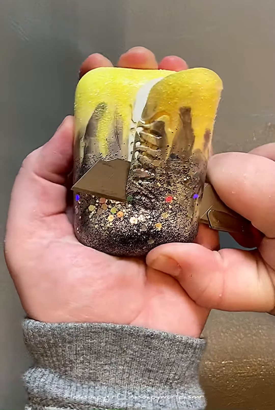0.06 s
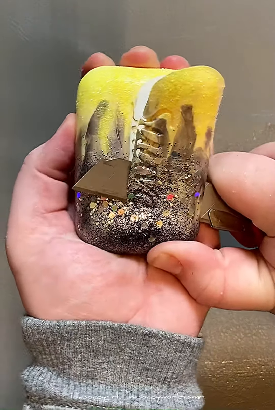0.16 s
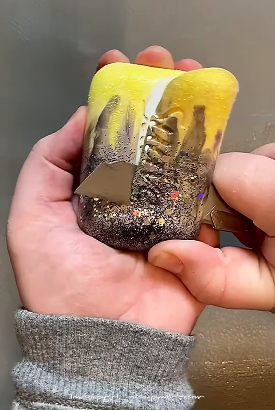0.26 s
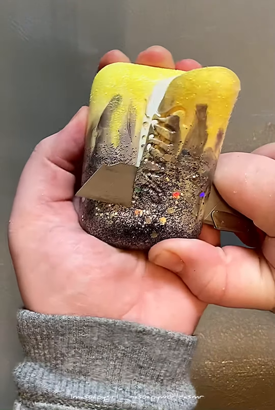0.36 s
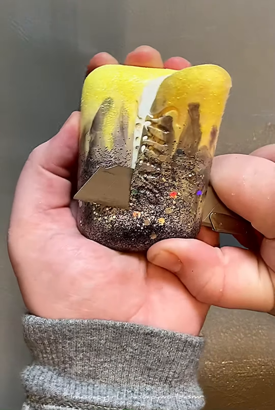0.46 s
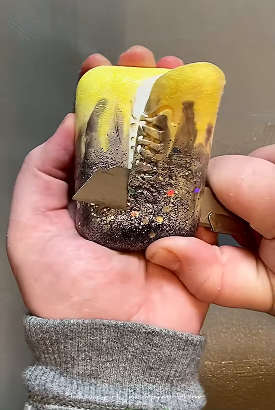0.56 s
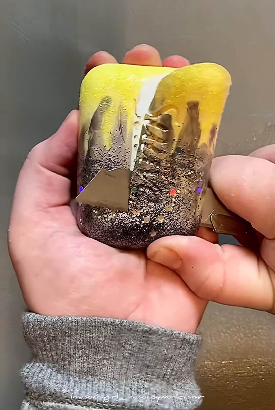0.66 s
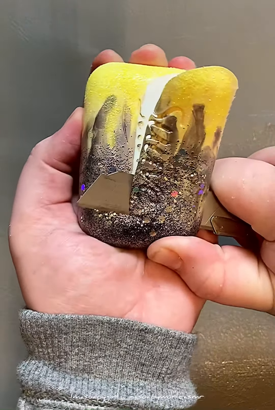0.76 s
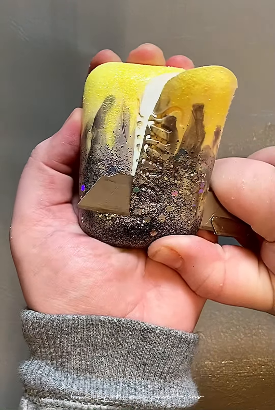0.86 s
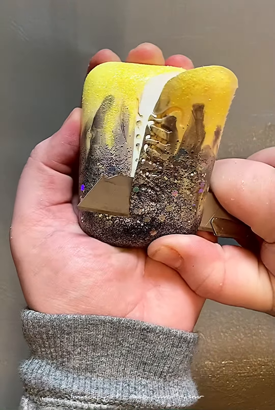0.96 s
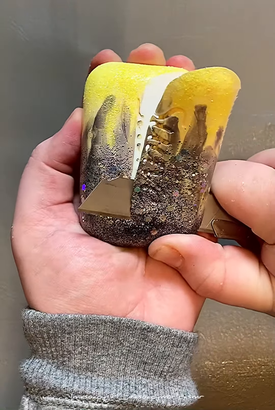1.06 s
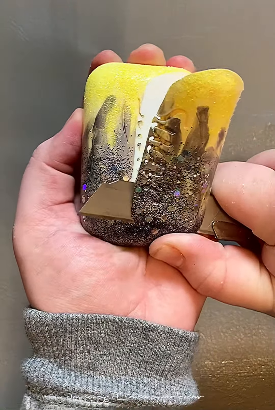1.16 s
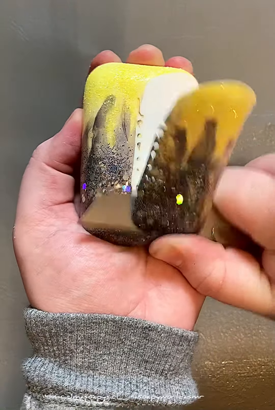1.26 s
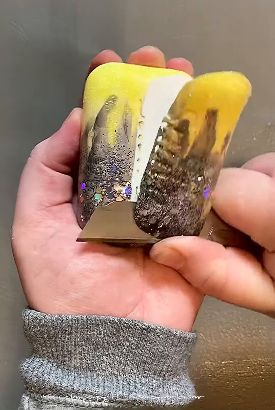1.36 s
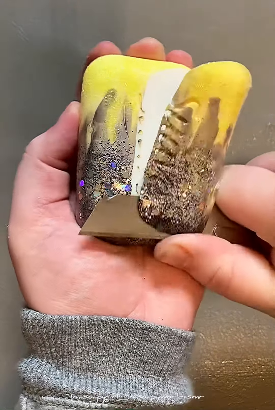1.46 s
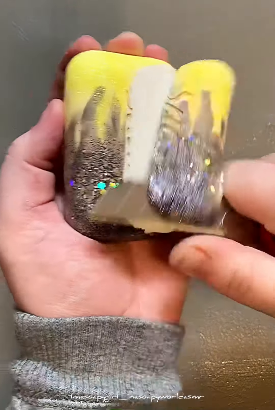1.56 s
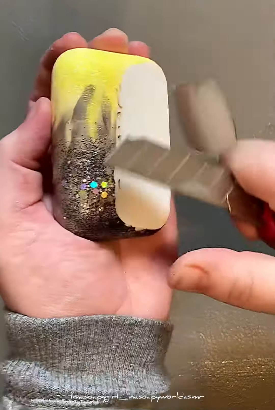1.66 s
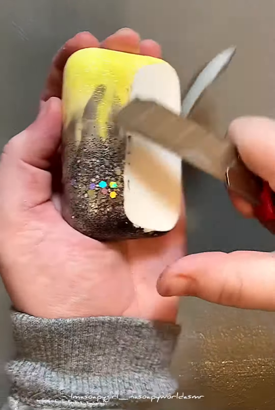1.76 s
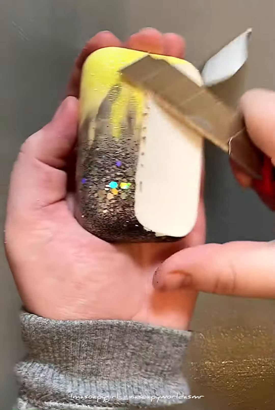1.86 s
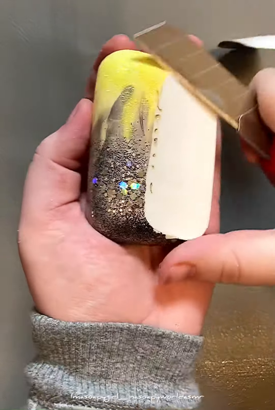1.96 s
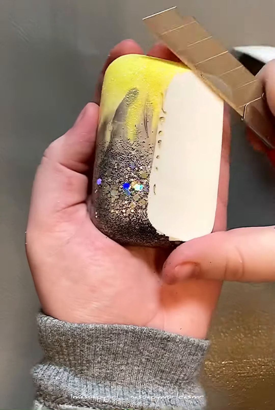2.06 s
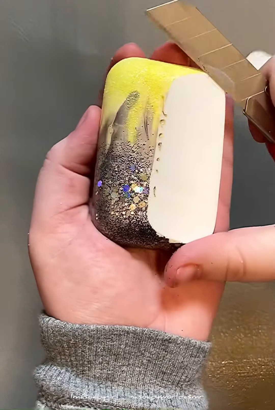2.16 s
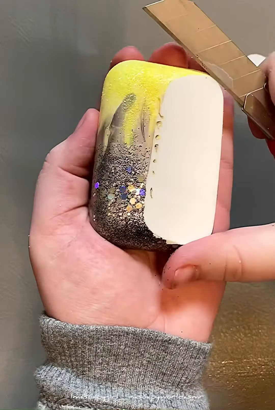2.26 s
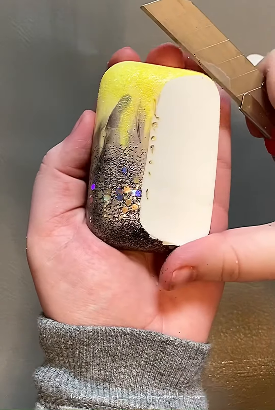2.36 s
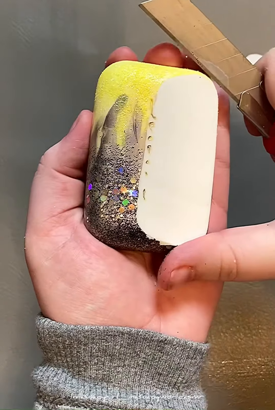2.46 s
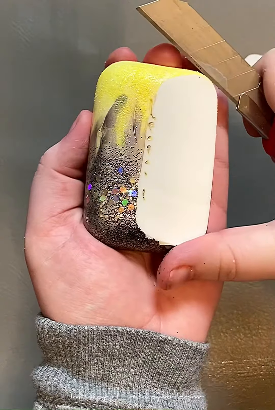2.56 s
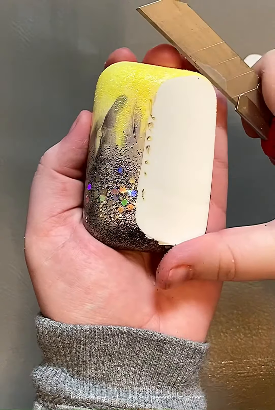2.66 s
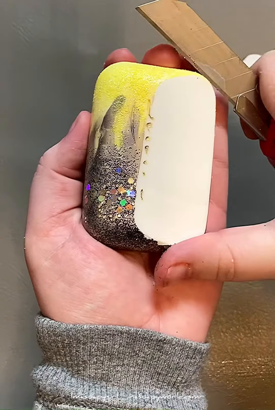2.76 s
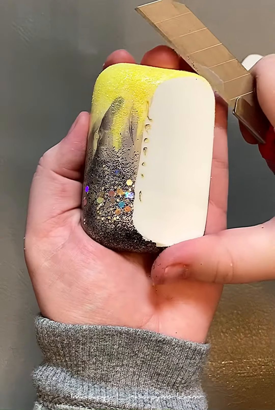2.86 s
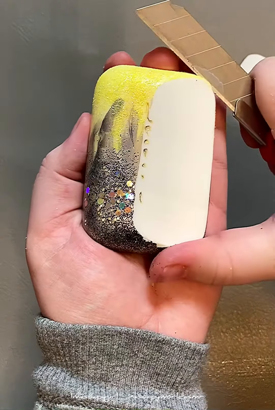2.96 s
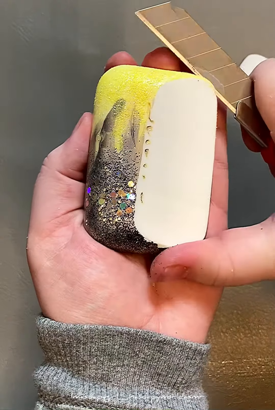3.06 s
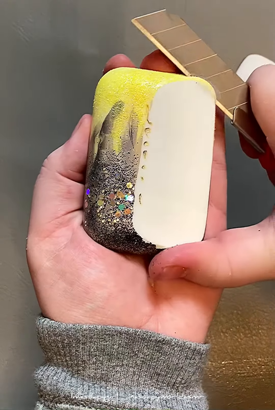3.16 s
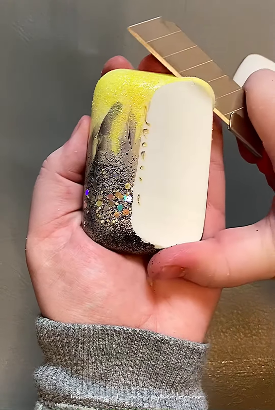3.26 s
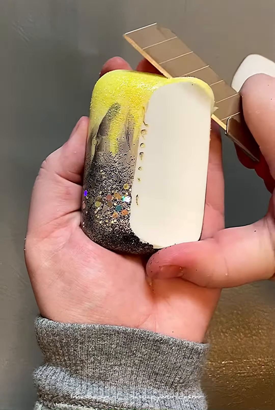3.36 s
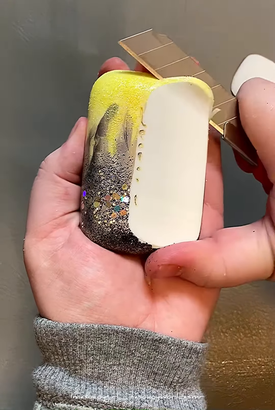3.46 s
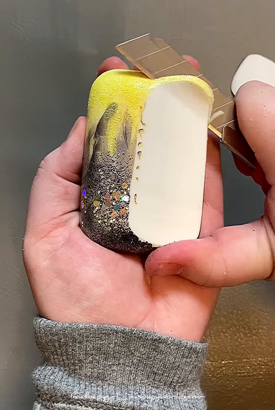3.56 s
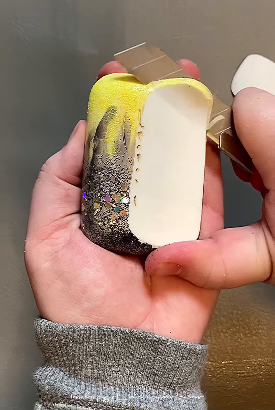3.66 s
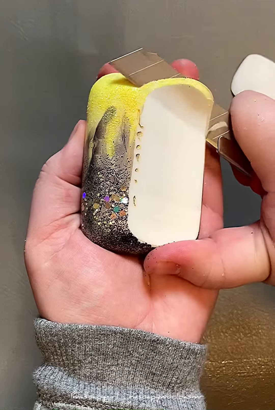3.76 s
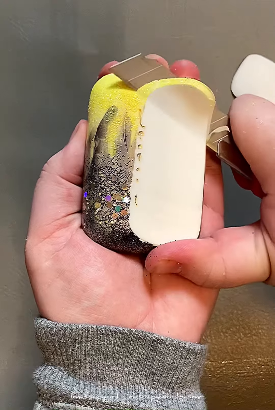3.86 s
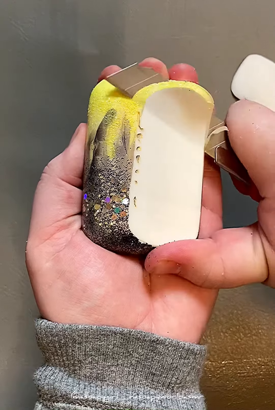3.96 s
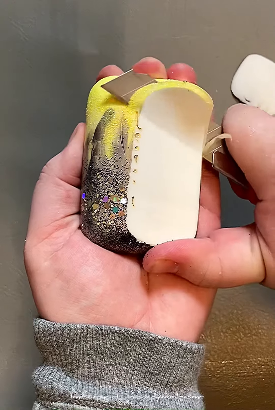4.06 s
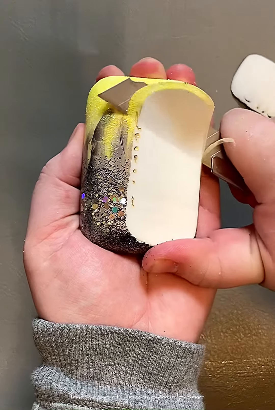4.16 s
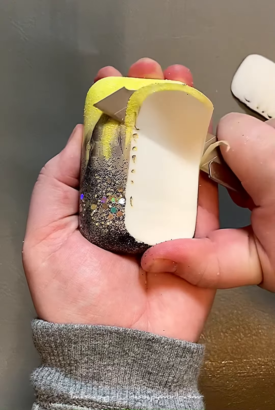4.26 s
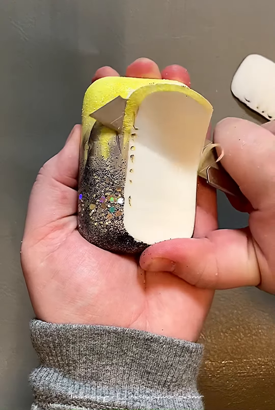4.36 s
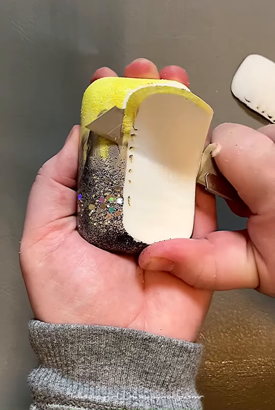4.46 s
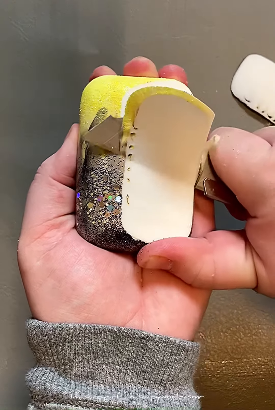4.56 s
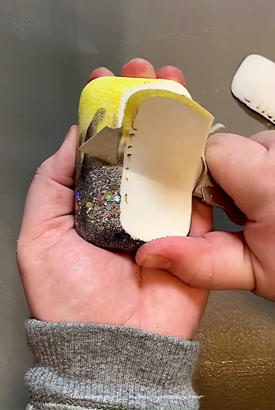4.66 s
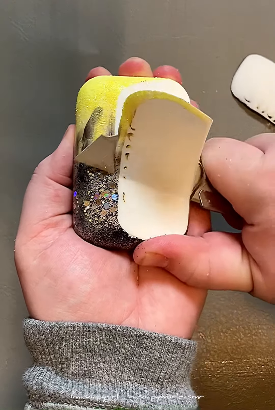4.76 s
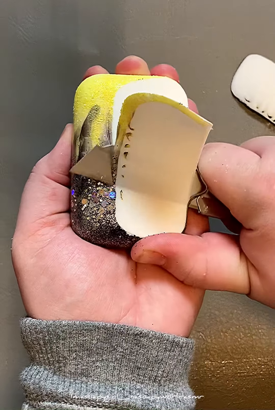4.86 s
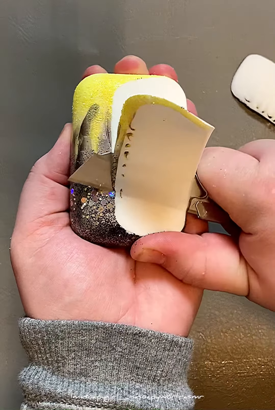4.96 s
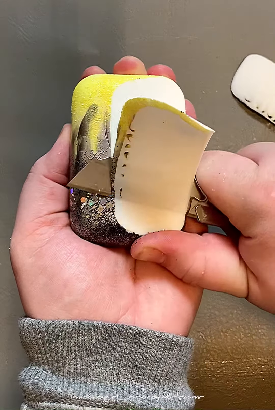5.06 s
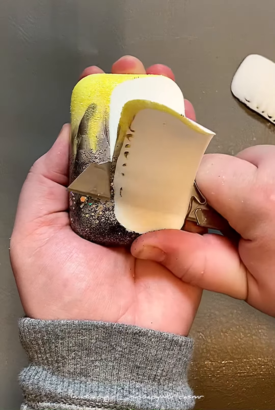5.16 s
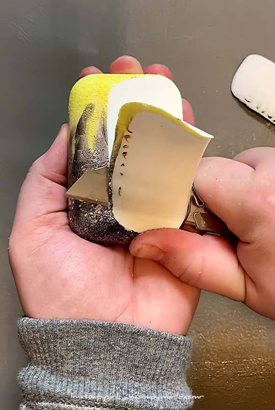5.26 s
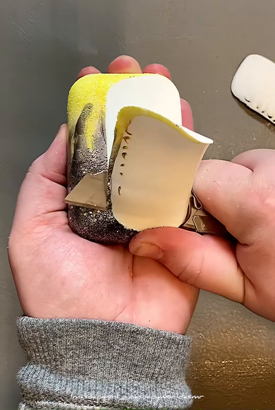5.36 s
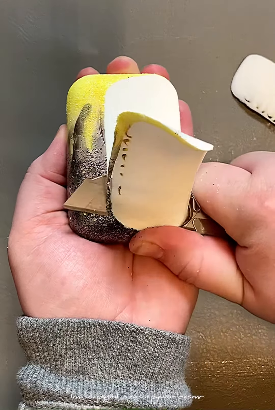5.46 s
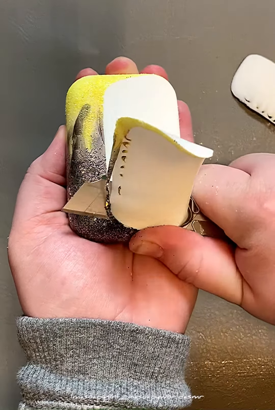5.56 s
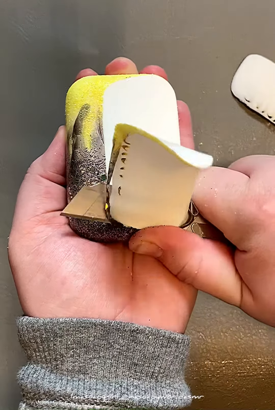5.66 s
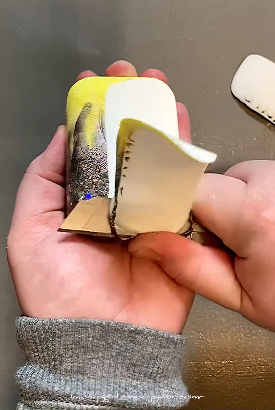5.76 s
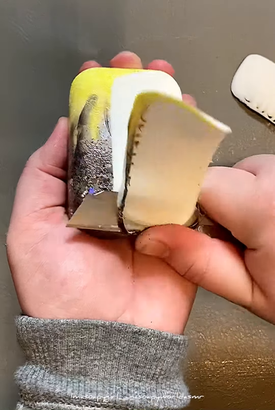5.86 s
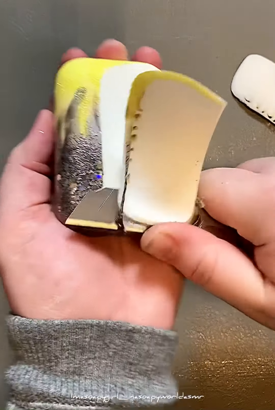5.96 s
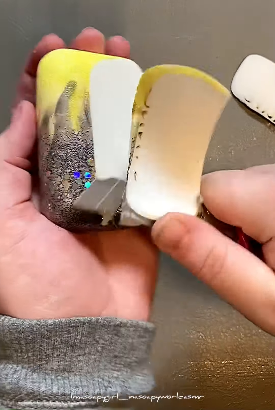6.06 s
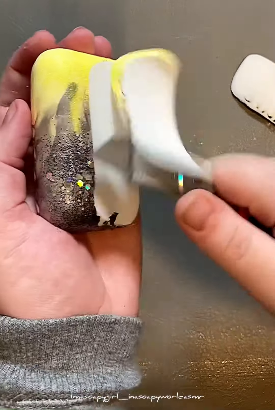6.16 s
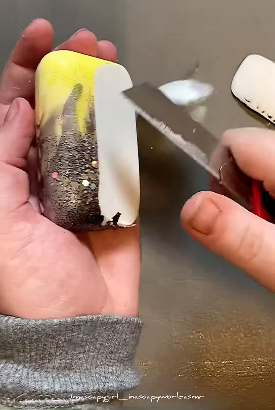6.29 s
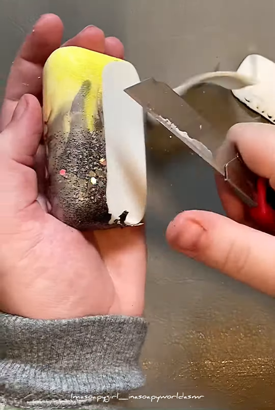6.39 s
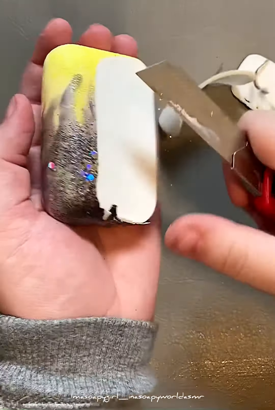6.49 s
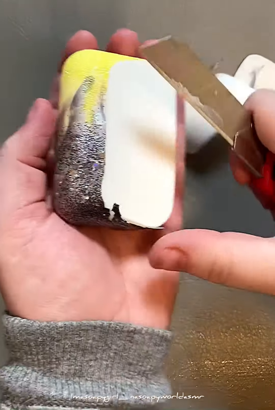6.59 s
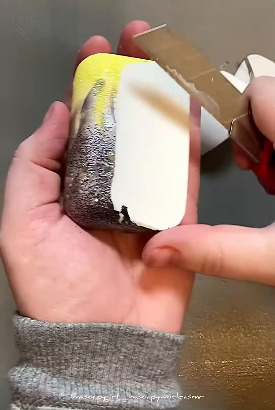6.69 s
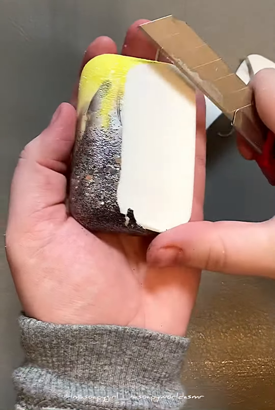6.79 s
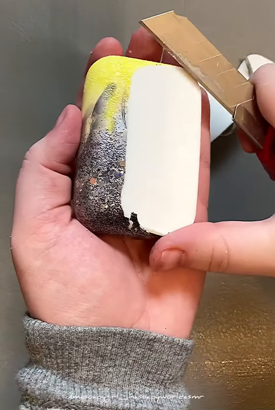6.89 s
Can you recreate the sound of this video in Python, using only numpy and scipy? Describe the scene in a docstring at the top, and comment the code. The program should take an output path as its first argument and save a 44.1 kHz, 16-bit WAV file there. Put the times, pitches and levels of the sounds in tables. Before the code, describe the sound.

Close up in a small quiet room, a thin knife cracks through a dry soap bar with brittle snaps and a light blade rattle. The first slab drops onto the table in a few dull thumps and scrapes. After a lull, finer crunches and crumbling begin a second cut, which breaks off with sharp snaps, a brief squeak and another tumble. Low ventilation rumbles throughout.

```python
"""Ventilation rumbles and hums in a small room: coloured noise, a motor hum and wandering drones.
Close to a small stereo recorder, a snap-off knife shaves two slabs from a bar of dry soap.
Tiny slips make the edge crunch, tear and scrape; gritty pulses crack the slab and jolt the blade.
The blade squeaks and whistles free by stick-slip; chirped thumps flop the slab onto the table."""
import sys
import numpy as np
from scipy import signal
from scipy.fft import rfft, irfft, next_fast_len
from scipy.io import wavfile
from scipy.ndimage import uniform_filter1d, map_coordinates

SR = 44100
rng = np.random.default_rng(int(sys.argv[2]) if len(sys.argv) > 2 else 0)


def master_out(mix):
    """Clip the mix to full scale and print it as 16-bit PCM to the path in sys.argv[1]."""
    frames = np.transpose(np.atleast_2d(mix))
    ceiling = np.clip(frames, -1, 1)
    pcm = np.round(ceiling * 32767).astype(np.int16)
    wavfile.write(sys.argv[1], SR, pcm)


N = 305613
TIME = np.arange(N) / SR  # s
HIT = np.arange(4096) / SR  # s, the time line of one short event
SIDES = np.array([[1], [-1]])  # left, right

# All level_db columns are relative: the functions balance and place the sources.

# Ventilation rumble: start_s [s], level_db [dB]
VENT_LEVEL = [(0, -51), (.35, -54), (3.4, -51.5), (4.3, -55), (5.5, -55), (6.3, -53), (6.6, -50),
              (6.75, -60.5), (6.93, -51)]
# Rumble spectrum: pitch_hz [Hz], level_db [dB per Hz]
RUMBLE_SPECTRUM = [(21, -44), (31, -29.5), (41, -8.5), (53, -3.5), (73, -0.14), (96, -1.5), (121, -4.5),
                   (151, -9.5), (191, -11.5), (241, -27), (331, -33), (610, -64.5), (1510, -62)]
# Faint air hiss spectrum: pitch_hz [Hz], level_db [dB per Hz]
HISS_SPECTRUM = [(100, 11.5), (500, 1.5), (1200, -7.5), (2500, -5), (5000, 3.5), (12000, -3), (15000, -5),
                 (15700, -16.5)]
HUM_HZ, HUM_DB = 58, -52.5  # motor hum, about which pitch and level waver
# Three low drones that wander in pitch, one curve each: start_s [s], pitch_hz [Hz], level_db [dB]
DRONE_CURVES = [
    [(0, 68, -58.5), (1.6, 73, -56), (2.9, 73, -61), (3.03, 75, -71), (3.1, 89, -49.5), (3.4, 80, -54.5),
     (3.9, 72, -63.5), (5.2, 67, -64.5), (5.9, 72, -48.5), (6.6, 72, -50), (6.75, 72, -77)],
    [(0, 109, -48), (.8, 112, -54), (1.4, 117, -57.5), (2.0, 119, -57.5), (2.3, 119, -64.5)],
    [(.5, 152, -70), (1.4, 161, -62.5), (3.3, 165, -64.5), (3.7, 145, -62.5), (4.5, 145, -63.5),
     (4.9, 145, -74)],
]

# Soap tearing softly along the blade: start_s [s], hold_s [s], tear_db [dB], powdery_hiss_db [dB]
TEARS = [(.215, 0.016, -81.5, -79.5), (4.87, 0.059, -74.5, -87), (5.28, 0.066, -85.5, -95),
         (5.94, 0.086, -71.5, -72), (6.075, 0.031, -76, -83.5), (6.115, 0.0039, -66.5, -68),
         (6.15, 0.048, -76.5, -66.5)]
TEAR_ATTACK_S, TEAR_RELEASE_S = .018, .022
# Tear spectrum: pitch_hz [Hz], level_db [dB per Hz]
TEAR_SPECTRUM = [(900, -19), (1600, -8.5), (2150, -11.5), (2700, 1.5), (3300, 3), (3900, -1), (4800, 1.5),
                 (6200, -35), (9000, -29)]
# Powdery hiss spectrum: pitch_hz [Hz], level_db [dB per Hz]
POWDER_SPECTRUM = [(5000, -31), (8000, 3), (10000, 1), (12500, 1), (14500, -2.5), (16000, -15)]

# Brittle fractures: start_s [s], glassy_crack_db [dB], lower_snap_db [dB], blade_jolt_db [dB],
# ring_hz [Hz] where the blade rings most, run_s [s] for which the crack runs on
FRACTURES = [(0.5849, -25.5, -57, -56, 4100, .0006), (1.2606, -19.5, -55, -36.5, 2050, 0.0009),
             (1.2664, -12, -32.5, -30, 2140, 0.00063), (1.2689, -12.5, -39, -33.5, 2050, 0.00045),
             (1.3225, -30, -20.5, -27.5, 3060, 0.001), (1.3394, -58, -53, -23, 2150, 0.00085),
             (1.381, -51, -53, -34, 2130, 0.0015), (1.3937, -44.5, -57, -67, 2130, 0.0012),
             (1.441, -38, -46.5, -40, 2740, .00084), (1.4865, -47, -48.5, -55.5, 1230, 0.0011),
             (1.5315, -40.5, -43, -25.5, 2600, 0.00068), (1.5813, -48, -56, -20.5, 2470, 0.0027),
             (1.5856, -20.5, -30.5, -16.5, 1810, 0.0029), (2.5615, -33.5, -50.5, -34, 2120, 0.00088),
             (2.5713, -50.5, -43, -23, 2570, 0.0015), (3.1085, -47, -45.5, -50.5, 4100, 0.00098),
             (3.129, -37.5, -57, -65, 4200, 0.00074), (3.166, -38, -56, -70.5, 4530, 0.0021),
             (3.324, -37.5, -45.5, -48, 3900, 0.0012), (3.5142, -37, -70, -50, 3900, 0.0005),
             (3.542, -47.5, -71, -69, 4230, .001), (3.582, -45.5, -55, -54, 4200, 0.0036),
             (3.8225, -52, -49, -51.5, 1700, 0.00096), (3.893, -52, -44, -61, 4060, 0.00087),
             (3.908, -42, -51, -68, 4200, 0.0011), (3.972, -38, -60, -72, 4200, 0.0017),
             (4.007, -35, -52, -73, 4200, 0.0013), (4.011, -39, -47, -66, 4200, .0008),
             (4.0215, -36, -61, -37, 4230, .0006), (4.025, -24, -34, -71, 4320, 0.00085),
             (4.032, -35, -48, -66, 4200, .0007), (4.0465, -35, -46, -64, 4200, .001),
             (4.062, -32, -41, -60, 4200, .0007), (4.082, -31, -46, -59, 4330, .0007),
             (4.103, -39, -54, -68, 4200, .0007), (4.136, -39, -54, -67, 4200, 0.0007),
             (4.154, -42, -48, -67, 4200, .0007), (4.161, -39, -46, -67, 4250, 0.0031),
             (4.217, -36, -51, -71, 4200, .0007), (4.2304, -32, -52, -65, 4200, 0.00088),
             (4.256, -36, -38.5, -68.5, 4300, 0.0027), (4.5717, -35.5, -40.5, -31.5, 1160, 0.00068),
             (5.5989, -37.5, -50.5, -38, 2617, 0.00081), (5.666, -37, -65, -42, 3050, 0.00045),
             (5.6949, -20.5, -42, -34, 3050, 0.0058), (5.702, -8, -29, -21, 3070, 0.0014),
             (5.712, -20, -56, -37.5, 3300, 0.00053), (5.7796, -53, -24, -26, 3150, 0.00057),
             (5.7855, -62, -38, -40.5, 1410, 0.0012), (5.931, -29, -42.5, -49, 3100, 0.00051),
             (5.9586, -26, -59, -39.5, 3920, .00082)]
# Glassy crack spectrum: pitch_hz [Hz], level_db [dB per Hz]
GLASSY_SPECTRUM = [(500, -29), (4000, -28), (7500, -9.5), (9000, -3), (10200, 3), (11200, 6), (12200, 3.5),
                   (14000, -4.5), (15400, -7.5), (16500, -26.5)]
# Lower snap spectrum: pitch_hz [Hz], level_db [dB per Hz]
SNAP_SPECTRUM = [(720, -26.5), (2450, -31.5), (3300, -14.5), (4200, 8.5), (5450, -1), (7450, 10),
                 (9450, -0.5), (14100, -13.5)]
# Modes of the blade in its holder: pitch_hz [Hz], level_db [dB], t60_s [s]
BLADE_MODES = [(1082, -1.5, .025), (1277, 3.5, 0.034), (1550, -7, .03), (1920, -18.5, .02),
               (2130, -3, 0.016), (2394, -10.5, 0.0055), (3120, 4.5, 0.0061), (3325, 3.5, .014),
               (3960, -3.5, 0.031), (4600, -9, .01)]
RATTLE_CYCLES = .014  # random phase slip per sample, blade loose in its holder
LEAD_S, LEAD_DB = 0.0011, -13.5  # soft noise swelling into each fracture: rise time, level over it
JERK_S = 0.0021  # typical spacing of the jerks of a running crack

# The blade tip springing free: time, source level, then its resonances
PING_S, PING_DB = .5857, -42
# Tip resonances: pitch_hz [Hz], width_hz [Hz], level_db [dB]
TIP_RESONANCES = [(3300, 700, -5), (4000, 650, 0)]

# Soap landing on the table: start_s [s], thump_db [dB], contact_tick_db [dB], crumb_spray_db [dB],
# bend_s [s] that the thump takes to spread through the table
LANDINGS = [(1.738, -22.5, -24.5, -35, 0.0053), (1.8028, -26.5, -29.5, -29.5, 0.0041),
            (1.877, -39.5, -45, -60, 0.0032), (2.121, -24.5, -25, -27, 0.0029),
            (2.139, -28.5, -37, -30.5, 0.005), (2.18, -33, -51, -43.5, 0.0042),
            (6.283, -21, -28, -37, 0.0051), (6.387, -34.5, -47.5, -39.5, 0.0041),
            (6.402, -25.5, -38, -40, 0.00344), (6.5006, -37, -44.5, -77, .004),
            (6.538, -50.5, -67, -77, 0.0033), (6.592, -50, -67, -75, 0.0037), (6.617, -44, -48, -67, .007)]
# Thump spectrum: pitch_hz [Hz], level_db [dB per Hz]
THUD_SPECTRUM = [(42, -41), (112, 7), (222, 3.5), (332, 8.5), (525, -5), (950, -9.5), (1650, -33.5),
                 (2650, -13), (6100, -49.5)]
# Contact tick spectrum: pitch_hz [Hz], level_db [dB per Hz]
CONTACT_SPECTRUM = [(400, -3), (1000, -5.5), (1800, -7), (2400, -22), (2900, -13.5), (3600, 0.5),
                    (4600, -8.5), (7000, -16), (9500, -16.5), (15500, -29)]
# Crumbs thrown off a landing slab: pitch_hz [Hz], level_db [dB per Hz]
SPRAY_SPECTRUM = [(2000, -24), (7000, -4), (9500, -9), (13000, -5), (16000, -14)]
# Table top modes: pitch_hz [Hz], level_db [dB], t60_s [s]
TABLE_MODES = [(108, -17, .25), (325, -13, .08), (860, -24, .05)]
THUMP_LAG_S, THUMP_LEAN_DB = -0.00014, 0  # left trails right (negative: leads), left minus right

# Strokes of the flat of the blade over soap: start_s [s], hold_s [s], rasp_db [dB], squeal_db [dB]
SLIDES = [(1.8655, 0.017, -48, -55), (1.895, 0.03, -49, -55.5), (1.935, .012, -40, -39),
          (1.949, .015, -42.5, -60), (2.087, 0.002, -40.5, -72), (2.106, 0.0054, -48.5, -58),
          (2.134, 0.0027, -56, -58.5), (6.031, 0.001, -69, -84), (6.07, 0.034, -85, -69),
          (6.112, 0.0039, -74, -46), (6.119, 0.005, -58, -41.5), (6.172, 0.0028, -63, -56)]
SLIDE_ATTACK_S, SLIDE_RELEASE_S = 0.0017, 0.001
SWELL_SHARE = 0.076  # longer strokes swell and fade more gently, by this share of their hold
# Blade flat on the soap, rasping: pitch_hz [Hz], width_hz [Hz], level_db [dB]
RASP_RESONANCES = [(1600, 580, -4), (2520, 520, -3), (3210, 790, -2), (4700, 900, -4.5),
                   (6550, 2300, -11.5)]
# Blade flat on the soap, squealing: pitch_hz [Hz], width_hz [Hz], level_db [dB]
SQUEAL_RESONANCES = [(8400, 1200, -8.5), (9970, 140, 12), (11600, 900, -7), (12800, 1100, -10.5)]

# Fingers shifting their grip: start_s [s], hold_s [s], dull_rub_db [dB], palm_slide_db [dB]
FINGERS = [(2.65, 0.54, -74, -84.5), (6.42, 0.045, -73, -73), (6.64, 0.037, -63, -88.5),
           (6.78, 0.17, -70, -81.5)]
GRIP_ATTACK_S, GRIP_RELEASE_S = .005, 0.0097
# Skin rubbing on the bar: pitch_hz [Hz], level_db [dB per Hz]
SKIN_SPECTRUM = [(120, 26.5), (330, 21.5), (520, -24), (900, -14.5), (2000, -33), (4000, -4), (9000, -33)]
# Bar sliding in the palm: pitch_hz [Hz], width_hz [Hz], level_db [dB]
PALM_RESONANCES = [(490, 240, 0), (1600, 460, -17)]
PALM_DRIFT_S = .01  # scale of the random time warp

# Bites of the edge into the crust: start_s [s], hold_s [s], dull_drag_db [dB], sharp_drag_db [dB],
# crumbling_db [dB]
BITES = [(3.11, 0.022, -81.5, -72.5, -63), (3.31, 0.052, -88.5, -73.5, -65.5),
         (3.5, 0.066, -91, -73.5, -75.5), (3.665, 0.0094, -79.5, -69.5, -64.5),
         (3.815, 0.0067, -77, -79, -60), (3.885, 0.29, -95, -83, -65), (4.02, 0.033, -74.5, -71, -52),
         (4.14, 0.13, -85.5, -69, -61)]
BITE_ATTACK_S, BITE_RELEASE_S = 0.014, 0.043
# Buried edge dragging dully: pitch_hz [Hz], width_hz [Hz], level_db [dB]
DULL_RESONANCES = [(1250, 300, -10), (1980, 400, 0)]
# Buried edge dragging sharply: pitch_hz [Hz], width_hz [Hz], level_db [dB]
SHARP_RESONANCES = [(4200, 800, 6.5), (5650, 820, -1), (6650, 950, 0)]
# Crumbling crust: pitch_hz [Hz], level_db [dB per Hz]
CRUMB_SPECTRUM = [(4000, -17), (7000, -10), (8200, 5), (9300, 8.5), (10300, -2), (11400, 0), (13500, -5),
                  (15500, -9), (16400, -24)]
CHIPS_PER_S, CHIP_DB, CHIP_SNAP_DB = 110, -17.5, 3.5  # stray chips: rate, mix level, their lower snap

# Separate catches of the squeak: start_s [s], hold_s [s], level_db [dB]
CATCHES = [(5.904, 0.008, -68), (5.93, 0.01, -72), (5.96, 0.045, -80), (6.008, 0.04, -71),
           (6.05, .028, -77), (6.078, 0.034, -70), (6.112, 0.012, -55), (6.126, .06, -71)]
# Squeak of the blade leaving the bar, rising overall: start_s [s], pitch_hz [Hz]
SQUEAK_PITCH = [(5.93, 1200), (6.05, 1300), (6.075, 1590), (6.12, 1568), (6.18, 1610)]
# Thin whistle as the blade leaves the second slab: start_s [s], hold_s [s], level_db [dB]
WHISTLES = [(6.07, 0.063, -67), (6.112, .003, -55), (6.119, .005, -46)]
WHISTLE_HZ = 14000  # centre of an unsteady pitch

# How the hands scatter the sound: pitch_hz [Hz], level_db [dB]
SCATTER_LEVEL = [(300, -17), (700, -9), (1500, -7), (3300, -4), (5000, -14), (12000, -17)]
SCATTER_S = .003
# Lean of the sound from the hands: pitch_hz [Hz], left_minus_right_db [dB]
BLADE_LEAN = [(600, -5), (1500, -0.5), (2500, -1), (4500, 0)]
# Decay of the room: pitch_hz [Hz], t60_s [s]
WALL_T60 = [(150, .2), (1000, .24), (3500, .25), (12000, .26)]
# Answer of the room: pitch_hz [Hz], level_db [dB]
WALL_ANSWER = [(100, -12), (400, -6), (1300, -9.5), (3500, -8.5), (6500, -28.5), (12000, -12.5)]
# Phase between the microphones: pitch_hz [Hz], left_trails_right_rad [radians]
MIC_TRAIL = [(400, 0), (1500, .2), (2800, .5), (3500, 1.4), (4300, 2.3), (5400, 3.0), (7200, 3.25),
             (9500, 4.7), (12000, 6.2)]
# Level between the microphones: pitch_hz [Hz], left_minus_right_db [dB]
MIC_LEAN = [(150, 1.3), (500, -.5), (1300, 3.5), (3000, 4.2), (4500, .3), (12000, -.4)]
TOP_HZ = 16200  # band limit


def amp(db):
    """Decibels to gain."""
    return 10 ** (np.asarray(db) / 20)


def unit(x):
    """Scale to rms 1."""
    return x / np.sqrt(np.mean(x ** 2) + 1e-20)


def peaked(x):
    """Scale each row to peak 1."""
    return x / np.abs(x).max(axis=-1, keepdims=True)


def along(points, hz):
    """Read (Hz, value) points on a log frequency axis."""
    point_hz, values = np.transpose(points)
    return np.interp(np.log(hz + 1), np.log(point_hz), values)


def level(rows):
    """Gain per sample from (s, dB) rows."""
    return amp(np.interp(TIME, *np.transpose(rows)))


def wobble(rate):
    """A smooth random curve, rate knots a second."""
    knots = rng.standard_normal(int(N * rate / SR) + 4)
    return map_coordinates(knots, [TIME * rate])


def filtered(x, response):
    """x times a complex response of frequency."""
    n = x.shape[-1]
    size = next_fast_len(n + 8192)  # room for the filter to ring out
    hz = np.fft.rfftfreq(size, 1 / SR)
    return irfft(rfft(x, size) * response(hz), size)[..., :n]


def colour(points):
    """The causal response whose magnitude follows (Hz, dB) points."""
    def response(hz):
        cepstrum = irfft(np.log(amp(along(points, hz))))
        half = len(cepstrum) // 2
        # folding the cepstrum forward in time gives minimum phase
        fold = np.r_[1, np.full(half - 1, 2), 1, np.zeros(half - 1)]
        return np.exp(rfft(cepstrum * fold))
    return response


def resonances(modes):
    """The causal response of steep-sided (Hz, width, dB) resonances."""
    def response(hz):
        total = 0
        for centre, width, db in modes:
            damping = 1j * hz * width
            total = total + amp(db) * (damping / (centre * centre - hz * hz + damping)) ** 2
        return total
    return response


def bursts(life, count):
    """Rows of noise that flare up and die on a scale of life seconds."""
    age = HIT / life
    return rng.standard_normal((count, len(HIT))) * np.sqrt(age) * np.exp(-age)


def placed(times, sounds):
    """Lay each row of sounds on the time line."""
    track = np.zeros(N + SR)
    for start_s, sound in zip(times, sounds):
        track[max(round(start_s * SR), 0):][:len(sound)] += sound
    return track[:N]


def grains(rate, spread_db, clump_db=0):
    """Tiny random slips, nominally rate a second, of uneven size, crowding into clumps."""
    size = amp(spread_db * np.clip(rng.standard_normal(N), -2, 2))
    crowding = amp(clump_db * wobble(110))
    slips = rng.random(N) < crowding * rate / SR
    return unit(slips * size * rng.choice([-1, 1], N))


def strokes(rows, attack_s, release_s, swell=0):
    """One attack-hold-release gain curve for each dB column of (s, hold s, dB, ..) rows."""
    rows = np.array(rows)
    shapes = []
    for start_s, hold_s in rows[:, :2]:
        rise = np.minimum(TIME - start_s, 0) / max(attack_s, swell * hold_s)
        fall = np.maximum(TIME - start_s - hold_s, 0) / max(release_s, swell * hold_s)
        shapes.append(np.exp(np.maximum(rise - fall, -20)))
    return amp(rows[:, 2:]).T @ np.array(shapes)


def ventilation():
    """Duct rumble, a motor hum, wandering drones and faint air hiss."""
    rumble = unit(filtered(rng.standard_normal(N), colour(RUMBLE_SPECTRUM)))
    diffuse = unit(filtered(rng.standard_normal((2, N)), colour(RUMBLE_SPECTRUM)))
    hum_tone = unit(np.sin(2 * np.pi * HUM_HZ * TIME + .3 * wobble(1.4)))
    hum = amp(HUM_DB + 0.76 * wobble(4)) * hum_tone
    for start_s, pitch_hz, level_db in map(np.transpose, DRONE_CURVES):
        cycles = np.cumsum(np.interp(TIME, start_s, pitch_hz)) / SR
        gain = amp(np.interp(TIME, start_s, level_db) + 1.2 * wobble(5.1))
        hum += gain * unit(np.sin(2 * np.pi * cycles))
    # the air is nearly the same at both microphones
    air = rng.standard_normal(N) + 0.026 * rng.standard_normal((2, N))
    hiss = unit(filtered(air, colour(HISS_SPECTRUM)))
    return level(VENT_LEVEL) * amp(1.5) * (rumble + amp(-8.5) * diffuse) + hum + amp(-77.0) * hiss


def tearing(uneven_db=4.0):
    """The slab peels from the bar in a rasp of tiny tears, with a powdery hiss above it."""
    gains = strokes(TEARS, TEAR_ATTACK_S, TEAR_RELEASE_S)
    tear_gain, hiss_gain = gains * amp(uneven_db * wobble(60))
    tears = grains(rate=1200, spread_db=5, clump_db=3) + .35 * rng.standard_normal(N)
    tear = unit(filtered(tears, colour(TEAR_SPECTRUM)))
    powder = unit(filtered(tears, colour(POWDER_SPECTRUM)))
    return tear_gain * tear + hiss_gain * powder


def jerks(run_s, count=5):
    """Rows of pulses: a crack advances in uneven jerks that fade over run_s."""
    pulses = np.zeros((len(run_s), len(HIT)))
    for row, run in zip(pulses, run_s):
        after = np.r_[0, np.cumsum(JERK_S * rng.uniform(.7, 1.3, count))]
        row[np.round(after * SR).astype(int)] = np.exp(-after / run)
    return pulses


def blade_ring(ring_hz, octave_db, dust_db, dust_s):
    """The jolted blade rings in its modes and grates briefly on the broken face."""
    count = len(ring_hz)

    def near_contact(hz):
        # the point of contact decides which pitches answer most
        return amp(octave_db * np.abs(np.log2(hz / ring_hz[:, None])))

    ring = np.zeros((count, len(HIT)))
    for hz, db, t60 in BLADE_MODES:
        strength, detune = rng.standard_normal((2, count, 1))
        phase = hz * (1 + 0.0028 * detune) * HIT + rng.random((count, 1))
        # rattling in the holder blurs each mode
        phase += np.cumsum(RATTLE_CYCLES * rng.standard_normal(ring.shape), axis=1)
        decay = amp(db + 1.7 * strength - 60 * HIT / t60)
        ring += near_contact(hz) * decay * np.sin(2 * np.pi * phase)
    ring = peaked(ring * (1 - np.exp(-HIT / 0.0002)))
    grating = filtered(bursts(dust_s, count),
                       lambda hz: resonances(RASP_RESONANCES)(hz) * near_contact(hz + 1))
    return ring + amp(dust_db) * peaked(grating)


def fractures(crack_grit=0.26, snap_grit=1.0, octave_db=-13, dust_db=-4, dust_s=0.0035):
    """Each fracture is a short run of sharp, gritty pulses; the released blade rattles briefly."""
    start_s, crack_db, snap_db, jolt_db, ring_hz, run_s = np.transpose(FRACTURES)
    count = len(start_s)
    click = HIT == 0
    crack = peaked(filtered(click + crack_grit * bursts(0.00017, count), colour(GLASSY_SPECTRUM)))
    snap = peaked(filtered(click + snap_grit * bursts(0.0004, count), colour(SNAP_SPECTRUM)))
    ring = blade_ring(ring_hz, octave_db, dust_db, dust_s)
    sounds = amp(crack_db)[:, None] * crack
    sounds += amp(snap_db + 3.0)[:, None] * snap
    sounds += amp(jolt_db - 15.0)[:, None] * ring
    # a brief swell of noise leads into each crack
    lead = rng.standard_normal((count, len(HIT))) ** 3 * np.exp(-HIT[::-1] / LEAD_S)
    lead *= amp(LEAD_DB) / np.linalg.norm(lead, axis=1, keepdims=True)
    pulses = np.hstack([lead, jerks(run_s)])
    return placed(start_s - len(HIT) / SR, signal.fftconvolve(pulses, sounds, axes=1))


def ping():
    """The blade tip springs free: one impulse rings its resonances in a thin ping."""
    flick = peaked(filtered(1.0 * (HIT == 0), resonances(TIP_RESONANCES)))
    return placed([PING_S], [amp(PING_DB) * flick])


def landings(settle=0.011, rustle=0.047, spray_s=0.0059):
    """Thumps chirp downward, as table bending waves carry treble faster; also contact noise."""
    start_s, thump_db, tick_db, spray_db, bend_s = np.transpose(LANDINGS)
    count = len(start_s)
    bend_hz = 300  # pitch that sets the scale of the bending delay

    def travel(hz):
        delay_cycles = 2 * np.sqrt(hz * bend_hz) - hz * np.sqrt(bend_hz / TOP_HZ)
        return np.exp(-2j * np.pi * bend_s[:, None] * delay_cycles)

    push = (HIT == 0) + settle * bursts(0.0055, count)  # the slab settles after the blow
    thump = peaked(filtered(push, lambda hz: colour(THUD_SPECTRUM)(hz) * travel(hz)))
    boom = np.zeros((count, len(HIT)))
    for hz, db, t60 in TABLE_MODES:
        decay = amp(db + 4.4 * rng.standard_normal((count, 1)) - 60 * HIT / t60)
        boom += decay * np.sin(2 * np.pi * hz * HIT)
    boom *= signal.windows.tukey(len(HIT), .2)
    contact = bursts(0.0009, count) + rustle * bursts(0.02, count)
    tick = peaked(filtered(contact, colour(CONTACT_SPECTRUM)))
    crumbs = grains(rate=2300, spread_db=8)[:count * len(HIT)].reshape(count, -1)
    crumbs = crumbs * np.sqrt(HIT) * np.exp(-HIT / spray_s)
    spray = peaked(filtered(crumbs, colour(SPRAY_SPECTRUM)))
    thumps = placed(start_s, amp(thump_db - 3.5)[:, None] * (thump + boom))
    contacts = placed(start_s, amp(tick_db + 3.5)[:, None] * tick + amp(spray_db)[:, None] * spray)
    return thumps, contacts


def sliding(uneven_db=2):
    """Stick and slip along the flat of the blade excites its low and high resonances."""
    gains = strokes(SLIDES, SLIDE_ATTACK_S, SLIDE_RELEASE_S, SWELL_SHARE)
    rasp_gain, squeal_gain = gains * amp(uneven_db * wobble(90))
    slips = grains(rate=1300, spread_db=6, clump_db=4) + .25 * rng.standard_normal(N)
    rasp = unit(filtered(slips, resonances(RASP_RESONANCES)))
    squeal = unit(filtered(slips, resonances(SQUEAL_RESONANCES)))
    return rasp_gain * rasp + squeal_gain * squeal


def grip():
    """Skin rubs dully on the bar, and the bar shifts unevenly in the palm."""
    rub_gain, shift_gain = strokes(FINGERS, GRIP_ATTACK_S, GRIP_RELEASE_S, SWELL_SHARE)
    skin = unit(filtered(grains(rate=650, spread_db=12.0), colour(SKIN_SPECTRUM)))
    slips = grains(rate=720, spread_db=9, clump_db=4)
    palm = unit(filtered(slips, resonances(PALM_RESONANCES)))
    # the hollow of the palm changes size
    palm = map_coordinates(palm, [(TIME + PALM_DRIFT_S * wobble(3)) * SR])
    return rub_gain * skin + shift_gain * palm * amp(4 * wobble(16))


def cutting(uneven_db=3.0):
    """Each bite drags the edge through the crust, crumbles it in micro-cracks and throws off chips."""
    dull_gain, sharp_gain, crumb_gain = strokes(BITES, BITE_ATTACK_S, BITE_RELEASE_S)
    cracks = grains(rate=1200, spread_db=5, clump_db=5)
    friction = cracks + .8 * rng.standard_normal(N)
    drag = dull_gain * unit(filtered(friction, resonances(DULL_RESONANCES)))
    drag += sharp_gain * unit(filtered(friction, resonances(SHARP_RESONANCES)))
    crumbs = unit(filtered(cracks + .7 * rng.standard_normal(N), colour(CRUMB_SPECTRUM)))
    breaks = grains(rate=CHIPS_PER_S, spread_db=6)
    chips = unit(filtered(breaks, colour(GLASSY_SPECTRUM)))
    chips += amp(CHIP_SNAP_DB) * unit(filtered(breaks, colour(SNAP_SPECTRUM)))
    unevenness = amp(uneven_db * (wobble(65) + wobble(23.13)))
    return unevenness * (drag + crumb_gain * (amp(-6) * crumbs + amp(CHIP_DB) * chips))


def friction_tone(pitch_hz, jitter, flutter_db):
    """A stick-slip tone, unsteady in pitch and strength."""
    pitch = pitch_hz * (1 + jitter * wobble(640))
    tone = np.sin(2 * np.pi * np.cumsum(pitch) / SR)
    return unit(amp(flutter_db * wobble(250)) * tone)


def squeak():
    """The blade catches again and again, in a rough tone that rises as less of it is held."""
    gain, = strokes(CATCHES, SLIDE_ATTACK_S, SLIDE_RELEASE_S)
    pitch_hz = np.interp(TIME, *np.transpose(SQUEAK_PITCH))
    return gain * friction_tone(pitch_hz, jitter=.045, flutter_db=4)


def whistle():
    """A thin, fluttering stick-slip tone above the squeal."""
    gain, = strokes(WHISTLES, SLIDE_ATTACK_S, SLIDE_RELEASE_S)
    return gain * friction_tone(np.full(N, WHISTLE_HZ), jitter=.018, flutter_db=4)


def table_echo(x, echo_db=-9, delay_s=0.0011):
    """The table just below the hands reflects the cut; the path changes as they move."""
    path_s = delay_s * (1 + .08 * wobble(2.5))
    return x + amp(echo_db) * map_coordinates(x, [(TIME - path_s) * SR])


def scattered(x):
    """Fingers and bar scatter the sound within milliseconds, unlike for the two microphones."""
    paths = rfft(bursts(SCATTER_S, count=1)[0])
    # even out the broad spectrum of the random paths
    power = uniform_filter1d(np.abs(paths) ** 2, size=40).clip(1e-12)
    paths = irfft(paths / np.sqrt(power))
    scatter = signal.fftconvolve(filtered(x, colour(SCATTER_LEVEL)), paths)[:N]
    return filtered(x + SIDES * scatter, lambda hz: amp(SIDES * along(BLADE_LEAN, hz) / 2))


def aside(x, lag_s, lean_db):
    """A source off to one side: its path sets a time lag and level lean between the microphones."""
    half = SIDES / 2
    return filtered(x, lambda hz: amp(half * lean_db) * np.exp(-2j * np.pi * half * hz * lag_s))


def room(x, early_db=8.5, early_s=0.051):
    """Near surfaces answer early, then the walls; each microphone hears its own part of the tail."""
    hz, t, noise = signal.stft(rng.standard_normal((3, SR // 2)), SR, nperseg=256)
    decay = amp(-60 * t / along(WALL_T60, hz)[:, None])
    tails = signal.istft(noise * decay, SR, nperseg=256)[1]
    t = np.arange(tails.shape[1]) / SR
    tails = tails[0] + 1.4 * tails[1:]  # a shared part and one for each side
    onset = np.clip(t / 0.0051 - .5, 0, 1)
    tails = tails * (1 + amp(early_db) * np.exp(-t / early_s)) * onset
    send = filtered(x, colour(WALL_ANSWER))
    return signal.fftconvolve(send[None], tails / np.linalg.norm(tails[0]), axes=1)[:, :N]


def scene():
    """Knife and soap close by in the room, over the ventilation."""
    cut = tearing() + fractures() + ping() + sliding() + cutting() + squeak() + whistle()
    hands = table_echo(cut) + grip()
    thumps, contacts = landings()
    direct = scattered(hands + contacts) + aside(thumps, THUMP_LAG_S, THUMP_LEAN_DB)
    return direct + room(hands + thumps + contacts) + ventilation()


def record(dry):
    """Two microphones differ in phase and level by frequency; a steep band limit cuts the top."""
    half = SIDES / 2

    def response(hz):
        pair = amp(half * along(MIC_LEAN, hz)) * np.exp(-1j * half * along(MIC_TRAIL, hz))
        return pair / np.sqrt(1 + (hz / TOP_HZ) ** 160)

    return filtered(dry, response)


dry = scene()
out = record(dry)
master_out(out)
```